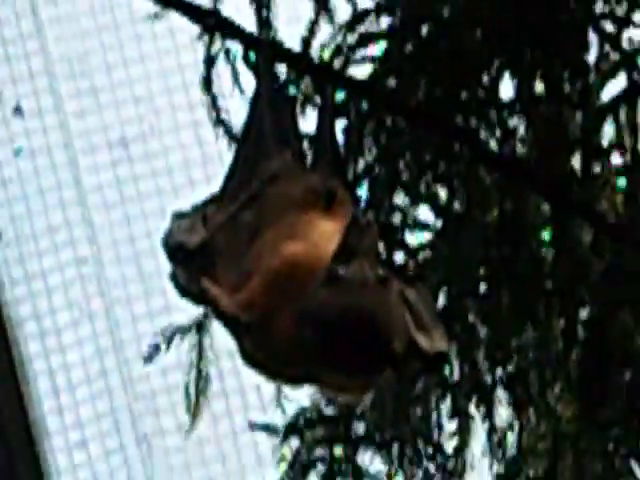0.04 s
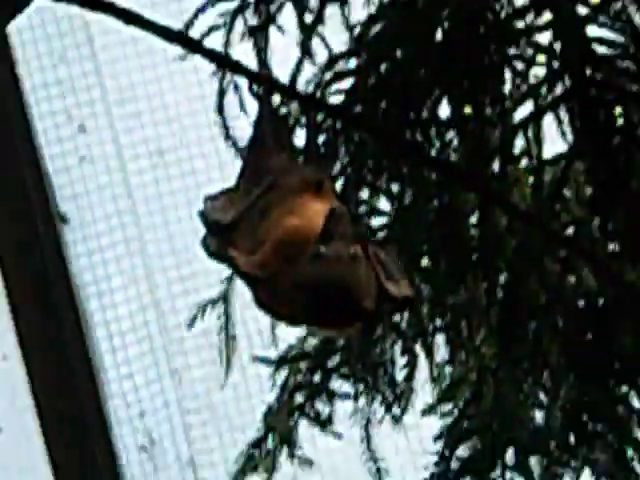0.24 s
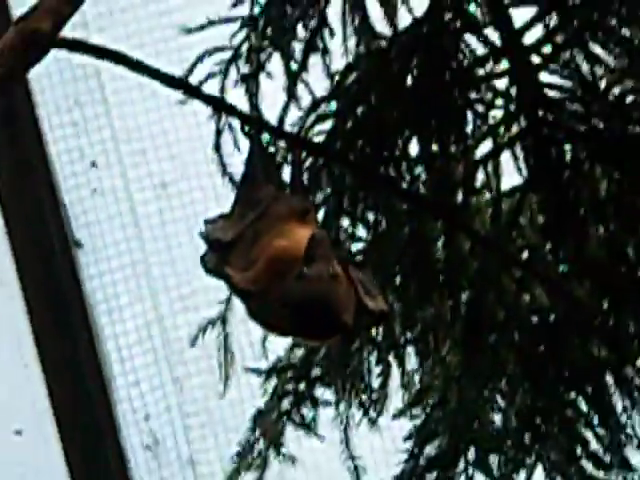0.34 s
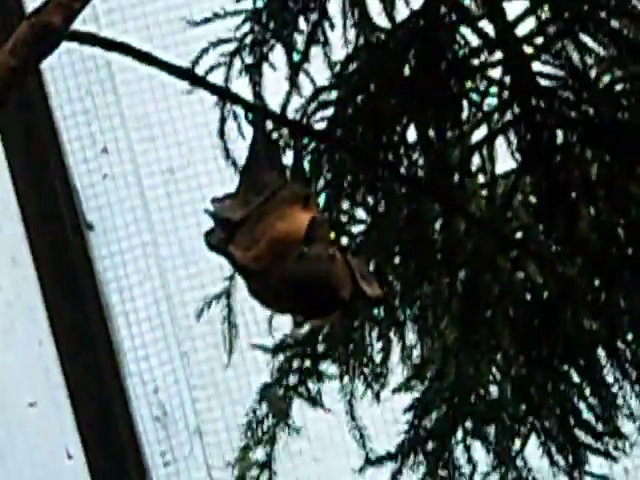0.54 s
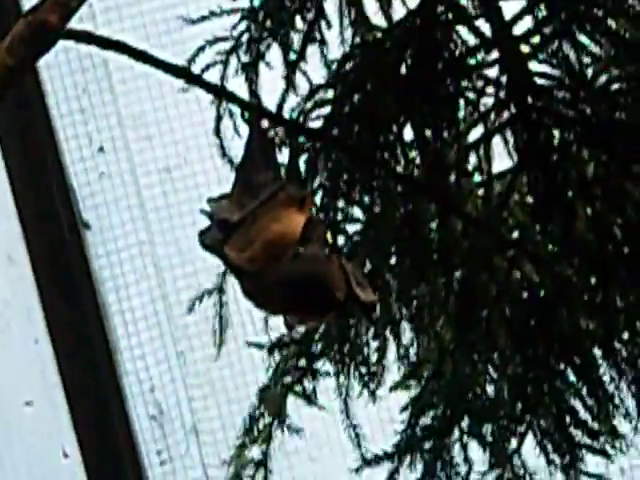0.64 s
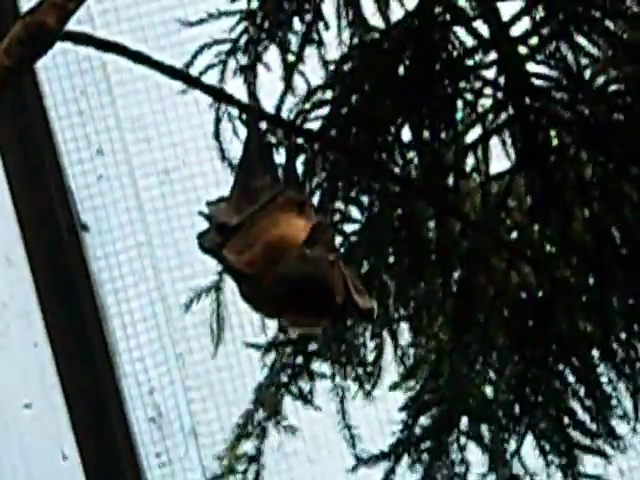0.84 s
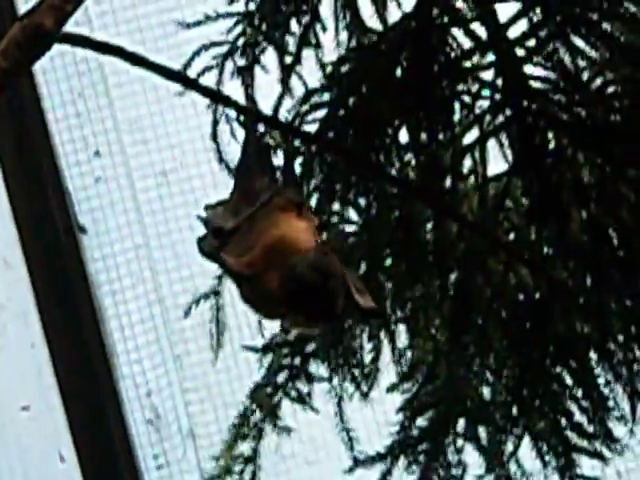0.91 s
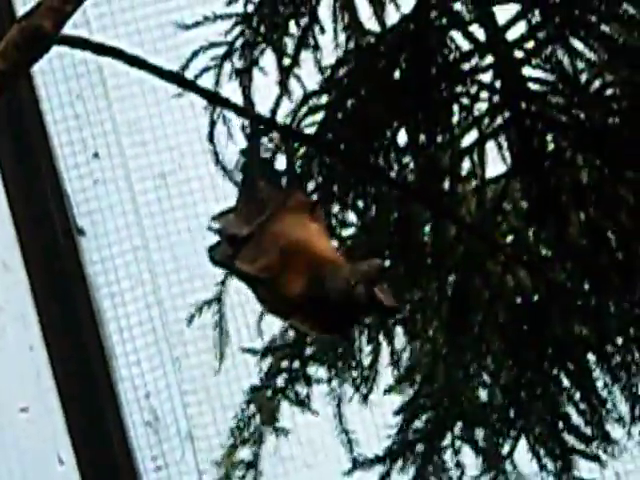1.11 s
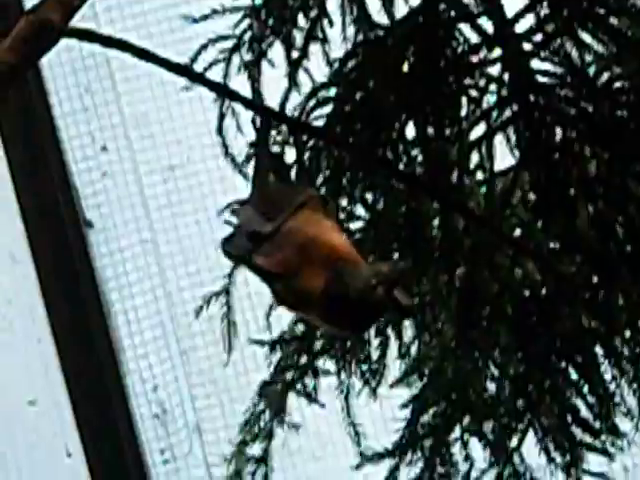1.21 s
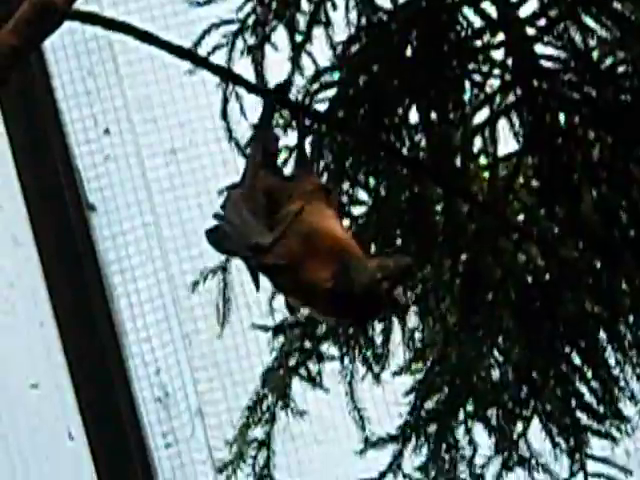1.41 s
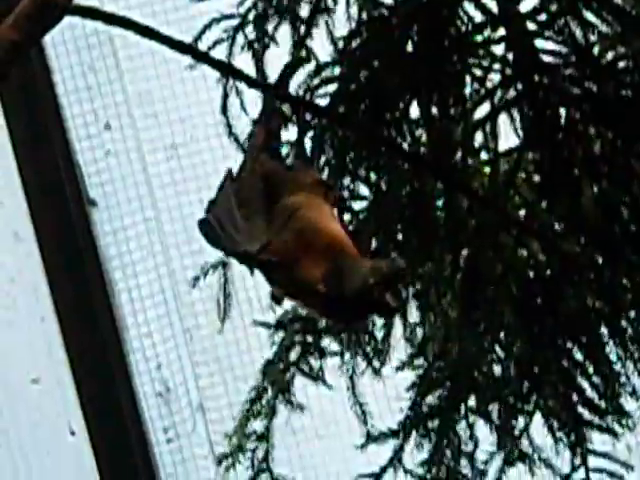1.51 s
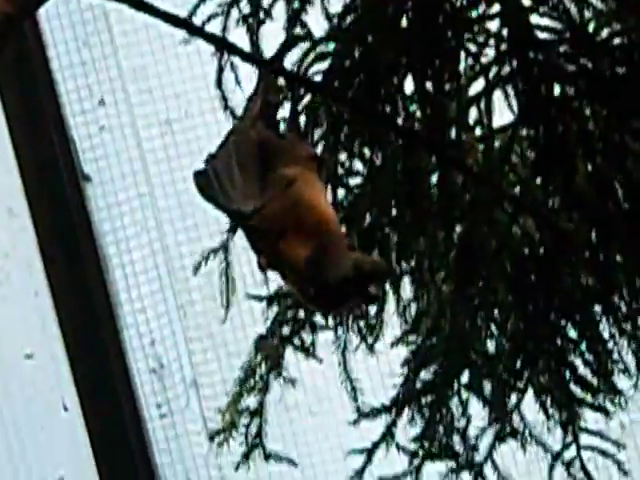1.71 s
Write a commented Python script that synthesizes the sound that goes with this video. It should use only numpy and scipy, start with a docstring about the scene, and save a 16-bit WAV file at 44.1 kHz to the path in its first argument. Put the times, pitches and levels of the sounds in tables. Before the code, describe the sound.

Plastic clicks and one hard snap from handling a camera, over steady ventilation hum.

```python
"""Camera handling in a zoo hall

A hand works a small camera right at the microphone: the plastic case ticks, knocks and rubs. One hard
snap overloads the microphone, sets a small spring ringing and is followed by a brief rising squeak.
Farther off an animal, probably a bird, whistles once in the echoing hall. Underneath, ventilation
rushes and hums, a low drone swells once and the camera's electronics whine."""
import sys
import numpy as np
from scipy import signal
from scipy.io import wavfile
from scipy.ndimage import uniform_filter1d

SR = 44100
rng = np.random.default_rng(int(sys.argv[2]) if len(sys.argv) > 2 else 0)


def to_wav(sig):
    """Store sig (one row per channel, or 1-D mono) as 16-bit WAV at the path in sys.argv[1].

    Samples outside -1..1 are clipped; the rate is SR.
    """
    pcm = np.clip(np.atleast_2d(sig), -1, 1) * 32767
    pcm = np.round(pcm).astype(np.int16)
    wavfile.write(sys.argv[1], SR, pcm.T)  # frames by channels


N = 77175
TIME = np.arange(N) / SR


def amp(db):
    """Decibels to gain."""
    return 10 ** (np.asarray(db) / 20)


def unit_rms(x):
    """Scales a signal to rms 1."""
    return x / np.sqrt(np.mean(abs(x) ** 2) + 1e-20)


def drift(width_hz):
    """Smooth random modulator: complex noise of rms 1, rolling off around width_hz."""
    real, imag = rng.standard_normal((2, N))
    rolloff = np.exp(-.5 * (np.fft.fftfreq(N, 1 / SR) / width_hz) ** 2)
    return unit_rms(np.fft.ifft((real + 1j * imag) * rolloff))


def ring(start, hz, t60, attack_s):
    """One struck mode: a rounded attack, then an exponential decay."""
    t = np.maximum(TIME - start, 0)
    attack = 1 - np.exp(-(t / attack_s) ** 2)
    return attack * np.exp(-np.log(1000) * t / t60) * np.sin(2 * np.pi * hz * t)


def swell(peak_s, half_width_s):
    """Bell-shaped fade in and out."""
    return np.exp(-((TIME - peak_s) / half_width_s) ** 2)


def glide(points):
    """Pitch and gain curves through breakpoints (t/s, f/Hz, level/dB), silent outside them."""
    times, hz, db = np.transpose(points)
    gate = (TIME > times[0]) * (TIME < times[-1])
    return np.interp(TIME, times, hz), amp(np.interp(TIME, times, db)) * gate


def lowpass(x, hz):
    """Steep high cut."""
    return signal.oaconvolve(x, signal.firwin(255, hz, window=("kaiser", 9), fs=SR), "same")


# Resonances of the plastic case: f/Hz, relative level/dB, t60/s
CASE_MODES = [(634, -23, 0.022), (990, -8.5, .017), (1321, -4.5, 0.011), (1880, -10.5, 0.013),
              (2296, -6, .012), (2866, -3, 0.014), (3155, -6, 0.016), (3873, -0.5, 0.011),
              (4330, -2.5, 0.01), (5114, -5, 0.012), (5896, -8, 0.0072)]
# Click cues: t/s, level/dB, low-mode gain/dB, tilt/(dB per octave), decay multiplier
CLICK_CUES = [(.0312, -18, 2, 3, 0.64), (.0633, -33.5, -16, 1.5, 1.3), (.1035, -37, -13, 0, 1.2),
              (.2150, -7.5, -6.5, -0.5, 0.74), (0.2312, -8, 1, -3, 0.44), (.5180, -26, -18, 15, 0.6),
              (.5212, -19, -16, 3.5, 1.1), (.5250, -21.5, -13, -3, 1), (.5273, -20.5, -15, 0.5, 0.95),
              (0.5561, 3.5, -1, 0.5, 1.007), (.5765, -35, 10, 7, 1.2)]
CLICK_ATTACK_S, LAG_CYCLES, LOW_MODES_HZ, TILT_PIVOT_HZ = 0.00067, 1.1, 1500, 3000


def clicks():
    """Each click rings the case; the low modes speak a little later than the high ones."""
    out = np.zeros(N)
    for start, level_db, low_db, tilt_db, decay_scale in CLICK_CUES:
        for hz, mode_db, t60 in CASE_MODES:
            eq_db = low_db * (hz < LOW_MODES_HZ) + tilt_db * np.log2(hz / TILT_PIVOT_HZ)
            mode = ring(start + LAG_CYCLES / hz, hz, t60 * decay_scale, CLICK_ATTACK_S)
            out += amp(level_db + mode_db + eq_db) * mode
    return out


def spring():
    """A small spring rings on after the hard snap: one faint, high ping."""
    return amp(-40) * ring(start=.558, hz=3036, t60=0.67, attack_s=CLICK_ATTACK_S)


# Soft finger knocks: t/s, level/dB, f/Hz, t60/s
KNOCK_CUES = [(.2312, -10.5, 786, 0.019), (.2360, -17.5, 628, 0.011), (.4775, -20, 886, 0.038),
              (1.1162, -26, 870, 0.009), (1.4518, -23.5, 527, 0.011), (1.7358, -19.5, 980, 0.018)]


def knocks():
    """A fingertip on the case gives one dull, quickly damped note."""
    return sum(amp(db) * ring(start, hz, t60, attack_s=0.00055) for start, db, hz, t60 in KNOCK_CUES)


# Finger slides on the case: peak t/s, half-width/s, level/dB
RUB_CUES = [(.075, 0.033, -52), (0.233, 0.0074, -41.5), (0.526, 0.0082, -26), (0.561, .008, -27),
            (1.74, 0.027, -48)]
RUB_BAND_HZ = (830, 4500)


def rubs():
    """Skin sliding on plastic makes short, grainy hisses."""
    grains = rng.standard_normal(N) * amp(4 * drift(width_hz=150).real)
    bandpass = signal.butter(2, RUB_BAND_HZ, "band", fs=SR, output="sos")
    hiss = unit_rms(signal.sosfilt(bandpass, grains))
    return hiss * sum(amp(db) * swell(peak, half_width) for peak, half_width, db in RUB_CUES)


# Squeak contour: t/s, f/Hz, level/dB
SQUEAK_CONTOUR = [(.560, 607, -33.5), (.569, 693, -45.5), (.580, 800, -33), (.592, 840, -25.5),
                  (.600, 854, -38), (.607, 890, -60)]
# Squeak timbre: harmonic number, relative level/dB
SQUEAK_HARMONICS = [(1, 0), (2, -14), (3, -19)]


def squeak():
    """A finger slips on the case in quick, regular steps, making a short rising tone."""
    hz, gain = glide(SQUEAK_CONTOUR)
    phase = 2 * np.pi * np.cumsum(hz) / SR
    return gain * sum(amp(db) * np.sin(harmonic * phase) for harmonic, db in SQUEAK_HARMONICS)


# Contour of the animal's call: t/s, f/Hz, level before the dry/wet mix/dB
WHISTLE_CONTOUR = [(.350, 4080, -51.5), (.367, 4035, -39.5), (.395, 3975, -33), (.420, 3900, -31),
                   (.450, 4074, -27.5), (.478, 4112, -28), (.516, 4060, -23.5), (.542, 3860, -31),
                   (.575, 3733, -35.5), (.602, 3670, -34), (.635, 3510, -45.5)]
WAVER_RMS_HZ, WHISTLE_DRY_DB, WHISTLE_WET_DB = 75, -4.5, -4


def whistle():
    """A distant animal's wavering, nearly pure note swells, falls and echoes in the hall."""
    hz, gain = glide(WHISTLE_CONTOUR)
    waver = unit_rms(np.tanh(2 * drift(width_hz=110).real))
    phase = 2 * np.pi * np.cumsum(hz + WAVER_RMS_HZ * waver) / SR
    note = gain * np.sqrt(2) * np.sin(phase)
    return amp(WHISTLE_DRY_DB) * note + amp(WHISTLE_WET_DB) * hall(note)


def hall(x, t60=0.71, build_s=0.0074):
    """Hall reverb: dense echoes build up and die away."""
    envelope = (1 - np.exp(-TIME / build_s)) * np.exp(-np.log(1000) * TIME / t60)
    tail = rng.standard_normal(N) * envelope
    return signal.fftconvolve(x, tail / np.linalg.norm(tail))[:N]


# EQ curve of the ventilation's rush: f/Hz, relative level/dB
AIR_EQ = [(15, -6), (32, -8.5), (50, -8), (100, 1.5), (210, -2), (262, 3.5), (318, -2), (365, 4),
          (405, -5.5), (470, -3), (540, -5.5), (700, -5), (1030, -7.5), (1220, -17.5), (1700, -16.5),
          (2900, -23.5), (3800, -26.5), (5200, -26.5), (5600, -31.5)]
AIR_DB, AIR_PATCH_DB = -34.5, 2


def air():
    """Moving air lays a steady noise bed, with faint patches drifting through its spectrum."""
    frames = dict(nperseg=2048, noverlap=1536)
    hz, _, spectrum = signal.stft(rng.standard_normal(N), SR, **frames)
    patches = uniform_filter1d(rng.standard_normal(spectrum.shape), size=16, axis=0)  # across pitch
    patches = unit_rms(uniform_filter1d(patches, size=8, axis=1))  # across time
    eq_hz, eq_db = np.transpose(AIR_EQ)
    colour_db = np.interp(np.log(hz + 1), np.log(eq_hz), eq_db)[:, None]
    _, rush = signal.istft(spectrum * amp(colour_db + AIR_PATCH_DB * patches), **frames)
    return amp(AIR_DB) * unit_rms(rush[:N])


# Fan tones: f/Hz, level before the fader/dB, flutter amount (0-1), flutter width/Hz
FAN_TONES = [(145.1, -46, .8, 11), (289.6, -36, 0.58, 15), (436, -47, 0.7, 7.7), (685, -57.5, 0.58, 6.9),
             (867, -54, 0.7, 6.9), (1524, -66.5, .6, 8.4)]
# Fader ride on the whole hum: t/s, level/dB
FAN_FADER = [(0, -2.5), (.2, -6.5), (0.269, 1.5), (.35, -6.5), (.47, 0.5), (0.632, 1.5), (.72, 2.5),
             (0.861, 2.5), (.93, -6), (.99, 1.5), (1.09, -1), (1.19, 3), (1.32, -1.5), (1.40, 4),
             (1.511, -3.5), (1.651, 3), (1.75, 2)]


def fan():
    """The fan's blade tones each flutter in level and phase, and waver slowly together."""
    hum = np.zeros(N)
    for hz, db, flutter, width_hz in FAN_TONES:
        modulator = np.sqrt(1 - flutter ** 2) + flutter * drift(width_hz)
        carrier = np.exp(2j * np.pi * (hz * TIME + rng.random()))
        hum += amp(db) * unit_rms((modulator * carrier).real)
    return hum * amp(np.interp(TIME, *np.transpose(FAN_FADER)))


# Low swell in the hall: peak t/s, half-width/s, f/Hz, level/dB
DRONE_CUE = (1.58, .05, 159, -33)


def drone():
    """A low note rises out of the bed and sinks back."""
    peak, half_width, hz, db = DRONE_CUE
    return amp(db) * swell(peak, half_width) * np.sin(2 * np.pi * hz * TIME)


# Electronic whine: f/Hz, level/dB
WHINE_TONES = [(5362, -59), (5663, -64)]


def whine():
    """The camera's electronics give off thin, steady tones."""
    return sum(amp(db) * unit_rms(np.sin(2 * np.pi * hz * TIME)) for hz, db in WHINE_TONES)


def scene():
    """Mono mix: close, dry handling up front, the whistle and the background bed behind."""
    handling = clicks() + spring() + knocks() + rubs() + squeak()
    return (handling + whistle() + air() + fan() + drone() + whine())[None]


def record(dry):
    """A narrow-band microphone clips on the hardest snap; a high cut trims the distortion."""
    narrow = lowpass(dry[0], hz=5815)
    clipped = np.clip(narrow, -1, 1)
    return lowpass(clipped, hz=16500)[None]


dry = scene()
out = record(dry)
to_wav(out)
```